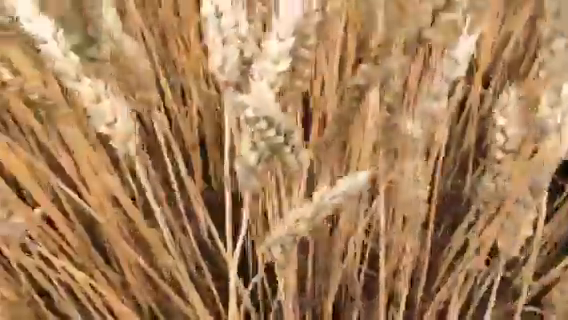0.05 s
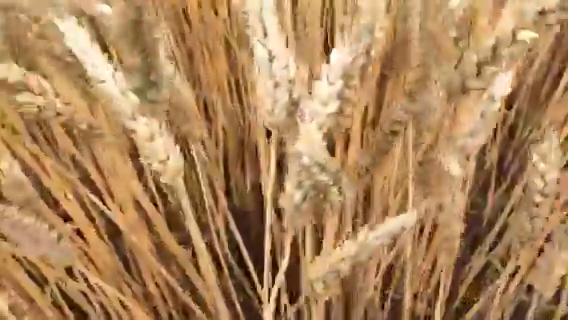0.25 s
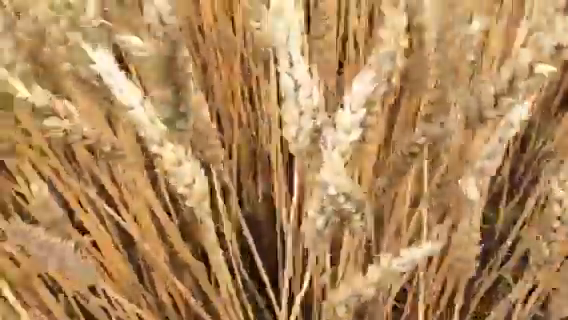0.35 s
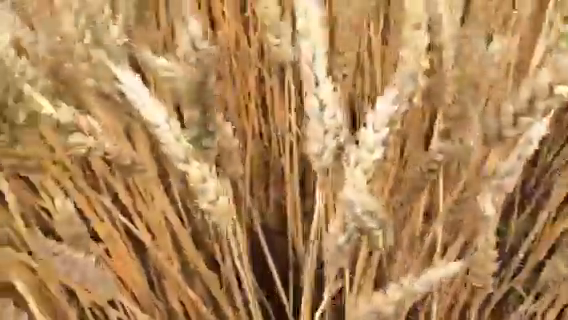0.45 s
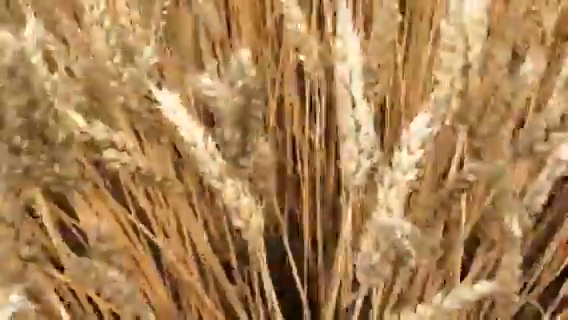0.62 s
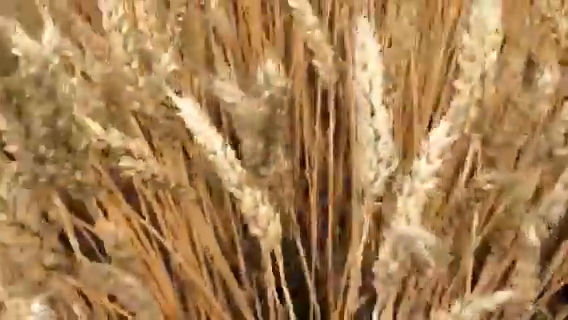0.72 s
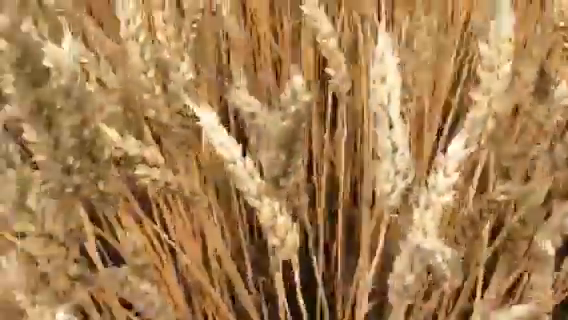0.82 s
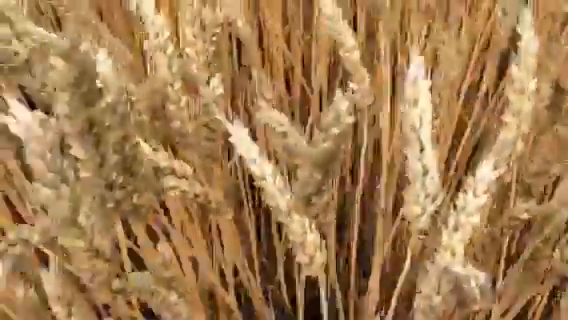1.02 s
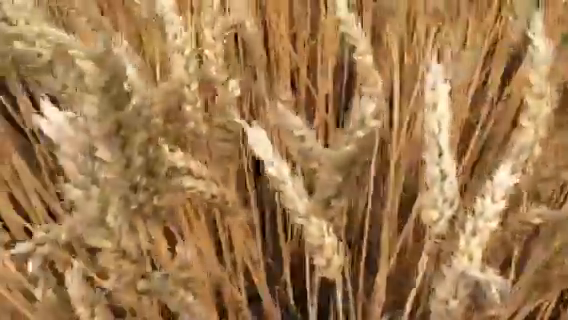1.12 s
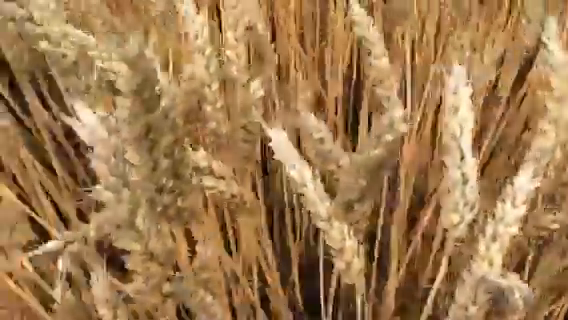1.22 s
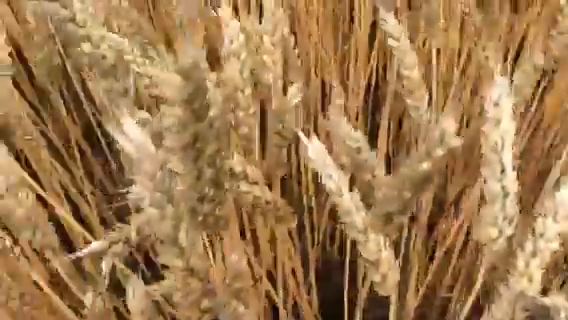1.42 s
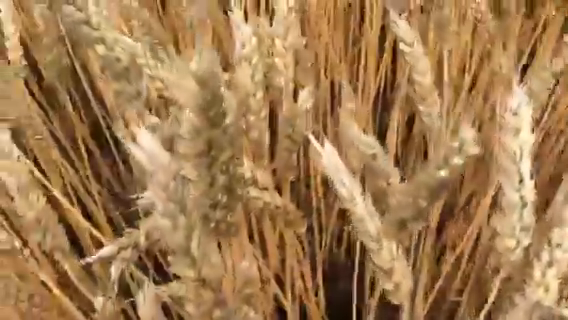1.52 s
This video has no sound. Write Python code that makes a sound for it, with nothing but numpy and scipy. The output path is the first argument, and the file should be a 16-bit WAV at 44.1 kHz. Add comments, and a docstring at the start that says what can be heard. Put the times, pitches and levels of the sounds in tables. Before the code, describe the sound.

A steady high insect hiss hangs over an open wheat field. A light gust rumbles on the microphone at first and dies down, while dry wheat ears give sparse, faint clicks close by.

```python
"""A steady high hiss of insects hangs over the still air of an open field.
A light gust rumbles over the microphone in the first second, with a few distinct
eddies, and dies down. Ripe wheat is drying: now and then a husk snaps close by,
a sharp crack with a grainy scatter, while farther ears tick faintly."""
import sys
import numpy as np
from scipy import signal
from scipy.fft import rfft, irfft
from scipy.io import wavfile
from scipy.ndimage import uniform_filter1d

SR = 44100
rng = np.random.default_rng(int(sys.argv[2]) if len(sys.argv) > 2 else 0)


def wrap_up_sound(samples):
    """Save the sound to the file named by the first command line argument, as 16-bit audio."""
    columns = np.atleast_2d(samples).T
    # keep every value between -1 and 1, then stretch to whole-number steps
    tamed = np.clip(columns, -1, 1)
    steps = np.round(tamed * 32767).astype(np.int16)
    wavfile.write(sys.argv[1], SR, steps)


N = 68355


def amp(db):
    """Decibels to gain."""
    return 10 ** (np.asarray(db) / 20)


def unit_rms(x):
    """Scales to rms 1."""
    return x / np.sqrt(np.mean(x ** 2) + 1e-20)


def colour(x, spectrum, tilt_db_oct=0):
    """Filters by a tilted spectrum table, normalised to rms gain 1."""
    hz = np.fft.rfftfreq(len(x), 1 / SR) + 1
    points_hz, points_db = np.transpose(spectrum)
    gain_db = np.interp(np.log(hz), np.log(points_hz), points_db) + tilt_db_oct * np.log2(hz)
    return irfft(rfft(x) * unit_rms(amp(gain_db)), len(x))


def noise(spectrum):
    """Steady coloured noise, rms 1."""
    return unit_rms(colour(rng.standard_normal(N), spectrum))


def drift(rate_hz):
    """Random fluctuation up to about rate_hz, rms 1."""
    hz = np.fft.rfftfreq(N, 1 / SR)
    white = rfft(rng.standard_normal(N))
    return unit_rms(irfft(white * (hz > 0) / (1 + (hz / rate_hz) ** 4), N))


def add(mix, start_s, sound):
    """Mixes a sound in at start_s."""
    part = mix[max(round(start_s * SR), 0):][:len(sound)]
    part += sound[:len(part)]


# Still-air spectrum: f/Hz, relative level/dB
AIR_SPECTRUM = [(20, -4), (60, 0.5), (180, 3.5), (400, 0), (600, -4), (1000, -5.5), (1400, -8),
                (2400, -10.5), (3600, -7), (9000, -10.5), (15000, -15.5)]


def air(level_db=-71.5):
    """Still air of the field: a faint broadband floor."""
    return amp(level_db) * noise(AIR_SPECTRUM)


# Chorus spectrum: f/Hz, relative level/dB
CHORUS_SPECTRUM = [(3000, -39.5), (4250, -25.5), (4700, -13.5), (5250, -11), (5650, -5.5), (6000, -4.5),
                   (6650, -6), (7250, -14.5), (8000, -25.5), (9500, -40)]
# Nearer insects: f/Hz, half-width/Hz, level/dB
NEAR_INSECTS = [(5755, 110, -70), (5960, 21, -69), (6170, 11, -68), (6226, 93, -70)]


def insects(chorus_db=-57, flutter_db=0.61, flutter_hz=54):
    """Stridulating insects merge into one fluttering band; nearer ones add narrow, wavering notes."""
    hz = np.fft.rfftfreq(N, 1 / SR)
    chorus = amp(chorus_db) * noise(CHORUS_SPECTRUM)
    for centre_hz, half_width_hz, level_db in NEAR_INSECTS:
        band = rfft(rng.standard_normal(N)) / (1 + ((hz - centre_hz) / half_width_hz) ** 2)
        chorus += amp(level_db) * unit_rms(irfft(band, N))
    return chorus * amp(flutter_db * drift(flutter_hz))


def turbulence(spectrum, levels, window_samples=800):
    """Churning air: noise, levelled by its running power, follows a level curve."""
    flow = noise(spectrum)
    power = uniform_filter1d(uniform_filter1d(flow ** 2, window_samples), window_samples)
    level_db = np.interp(np.arange(N) / SR, *np.transpose(levels))
    return amp(level_db) * flow / np.sqrt(power + 1e-6)


# Eddies at the microphone: t/s, peak level before low-pass/dB, width/s
EDDY_HITS = [(0.206, -35.5, 0.0075), (0.4563, -34, 0.0053), (0.473, -25.5, 0.0053), (0.516, -30.5, 0.0081),
             (.652, -31.5, 0.0068), (0.6727, -33.5, 0.0019), (.744, -26, 0.0045), (.744, -44, 0.002),
             (1.1, -53.5, 0.013), (1.208, -48.5, 0.0073), (1.291, -62, 0.0097)]


def eddies(cutoff_hz=570):
    """Each eddy is a brief, rounded dip in pressure between two rises."""
    t = np.arange(N) / SR
    pressure = np.zeros(N)
    for centre_s, peak_db, width_s in EDDY_HITS:
        offset_sq = ((t - centre_s) / width_s) ** 2
        pressure -= amp(peak_db) * (1 - 5 * offset_sq) / (1 + offset_sq) ** 4
    return signal.sosfiltfilt(signal.butter(4, cutoff_hz, fs=SR, output="sos"), pressure)


# Rumble and fine-turbulence spectra: f/Hz, relative level/dB
RUMBLE_SPECTRUM = [(15, -37), (35, -18), (60, 7), (95, 2), (150, -7), (220, -18.5), (320, -46.5),
                   (600, -69), (1500, -82)]
FINE_SPECTRUM = [(60, -18.5), (160, 7.5), (220, -1.5), (320, -8.5), (450, -13), (650, -34), (1500, -61)]
# Rumble and fine-turbulence envelopes: t/s, level/dB
RUMBLE_LEVELS = [(0, -75), (0.038, -60), (.11, -74.5), (.16, -52), (.185, -60), (0.209, -41),
                 (0.234, -56.5), (0.276, -43.5), (0.309, -61.5), (0.352, -36.5), (0.386, -51.5),
                 (.43, -34.5), (0.478, -38), (0.542, -44.5), (0.568, -52), (0.614, -42.5), (0.657, -38.5),
                 (.70, -51.5), (.73, -51.5), (.77, -42.5), (.82, -59.5), (.86, -72), (.91, -76), (.98, -79),
                 (1.06, -76.5), (1.12, -58.5), (1.165, -83), (1.21, -67.5), (1.35, -78), (1.55, -90)]
FINE_LEVELS = [(0, -81), (.15, -87), (.2, -59.5), (.236, -81), (.275, -83), (.32, -84), (.38, -83),
               (0.409, -53), (.456, -57.5), (.545, -76), (.595, -59), (.645, -58), (0.671, -44),
               (.705, -82), (.775, -62.5), (.82, -90), (1.45, -79), (1.55, -69.5)]


def wind():
    """A gust on the microphone: eddies, low rumble and finer turbulence."""
    return eddies() + turbulence(RUMBLE_SPECTRUM, RUMBLE_LEVELS) + turbulence(FINE_SPECTRUM, FINE_LEVELS)


# Husk spectrum: f/Hz, relative level/dB
HUSK_SPECTRUM = [(500, -20), (1800, -17.5), (3000, -1), (4200, 0.5), (6200, 2.5), (8300, 0), (10500, -5),
                 (13000, -0.5), (15200, -2.5)]


def snap(level_db, tilt_db_oct, scatter_db, crack_s=0.0007, decay_s=0.0042, grain_db=1.5, samples=2048):
    """A dry husk breaks: a sharp broadband crack and a few milliseconds of grainy scatter."""
    t = np.arange(samples) / SR
    decay = np.exp(-t / decay_s)
    crack_noise, scatter_noise, grain = rng.standard_normal((3, samples))
    spectrum = rfft(crack_noise * np.exp(-t / crack_s))
    crack = irfft(spectrum / abs(spectrum)) * np.sqrt(crack_s * SR / 2)  # whitened, energy restored
    scatter = amp(scatter_db) * unit_rms(scatter_noise * amp(grain_db * grain))
    burst = np.pad((crack + scatter) * decay, (samples, 0))
    return amp(level_db) * colour(burst, HUSK_SPECTRUM, tilt_db_oct)[samples:]


# Near husk snaps: t/s, level/dB, tilt/(dB/octave), relative scatter level/dB
NEAR_SNAPS = [(.1648, -51, -1, -4), (.4557, -61, 5, -11), (.6224, -53, -14, 0), (0.6504, -49.5, -0.5, -3),
              (0.808, -47, -2.5, -9), (0.9221, -44.5, 6.5, -1), (1.0427, -63, 9, 0), (1.1107, -62, 2, -3),
              (1.2210, -55, 1.5, -6), (1.2386, -58, 2, -0.5)]


def wheat(ticks_per_s=90, tick_floor_db=-74.5, tick_spread_db=2.5):
    """Drying husks snap close by; farther ears tick faintly at random."""
    husks = np.zeros(N)
    for start_s, level_db, tilt_db_oct, scatter_db in NEAR_SNAPS:
        add(husks, start_s, snap(level_db, tilt_db_oct, scatter_db))
    duration_s = N / SR
    for time_draw, level_draw in rng.random((round(ticks_per_s * duration_s), 2)):
        level_db = tick_floor_db + tick_spread_db * min(-np.log(level_draw), 3)
        add(husks, time_draw * duration_s, snap(level_db, tilt_db_oct=3.5, scatter_db=-2))
    return husks


def scene():
    """The field, in mono."""
    return (insects() + air() + wind() + wheat())[None]


def record(dry, cutoff_hz=15400):
    """Steep low-pass band limit."""
    lowpass = signal.firwin(511, cutoff_hz, window=("kaiser", 9), fs=SR)
    return signal.oaconvolve(dry, lowpass[None], "same")


dry = scene()
out = record(dry)
wrap_up_sound(out)
```